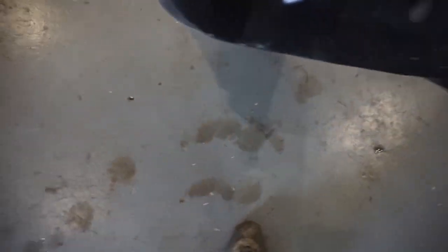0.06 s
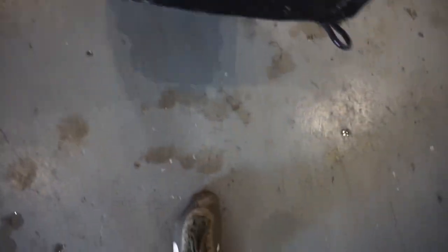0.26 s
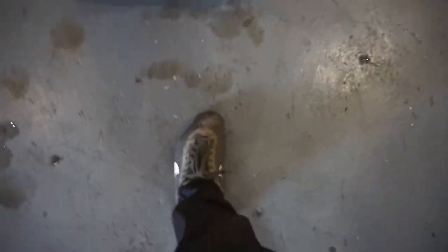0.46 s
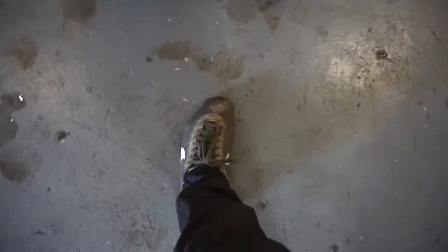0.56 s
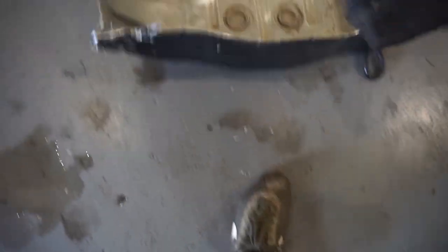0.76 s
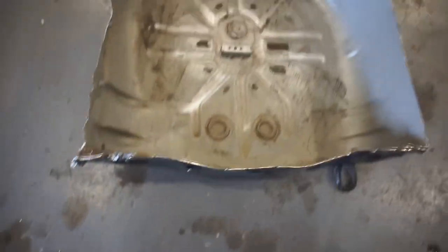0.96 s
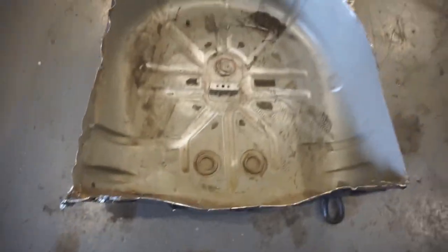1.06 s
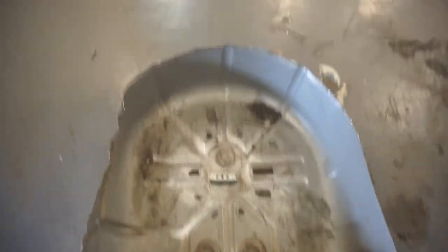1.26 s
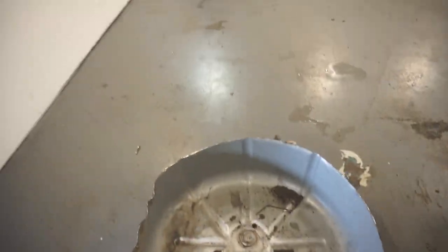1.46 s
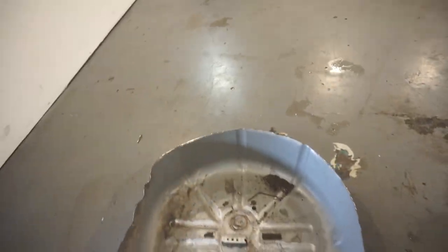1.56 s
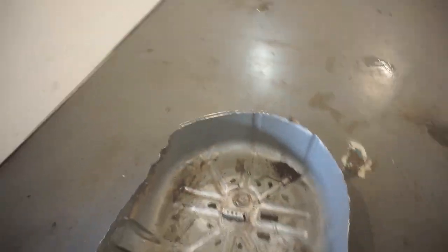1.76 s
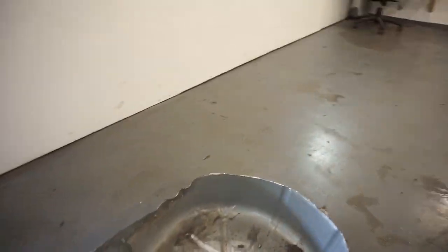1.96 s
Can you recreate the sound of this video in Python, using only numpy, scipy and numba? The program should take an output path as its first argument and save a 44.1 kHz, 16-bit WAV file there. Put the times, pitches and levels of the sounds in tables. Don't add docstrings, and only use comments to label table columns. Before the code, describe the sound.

A cut-out steel panel crashes onto a concrete garage floor. Soft cloth and shoe shuffling with tiny ticks comes first, then the slam at 0.44 seconds, with a short low boom, sharp edge cracks and scattering grit. It clatters and rocks, hitting hard again around 0.92 to 1.1, with a small hook clink near 1.25. Still by 1.36, the ring and bare-room echo fade to quiet.

```python
import sys
import numpy as np
from scipy import signal
from scipy.io import wavfile
from scipy.ndimage import uniform_filter1d
from numba import njit

SR = 44100
rng = np.random.default_rng(int(sys.argv[2]) if len(sys.argv) > 2 else 0)


def wrap_up_sound(samples):
    columns = np.atleast_2d(samples).T
    tamed = np.clip(columns, -1, 1)
    steps = np.round(tamed * 32767).astype(np.int16)
    wavfile.write(sys.argv[1], SR, steps)


def boost(x):
    u = np.asarray(x, float) / 20
    return 10 ** u


N = 88949

# t/s, contact level/dB, hardness/dB per octave, flexing of the whole sheet/dB per octave
LANDING = [
    (.444, -8.5, -4, 7.5),
    (.48, -17, -3.5, 1),
    (.555, -14, -4, 3.5),
    (.6, -22.5, 0.5, 8),
    (.67, -24, 0.5, 12.5),
    (.682, -22.5, 2, -10.5),
    (.76, -16.5, 1, -10),
    (.84, -14.5, -0.4, 1),
    (.918, -17, -2, -21.5),
]
ROCKING = [
    (0.926, -21, 1, 3.5),
    (.96, -17.5, 2, 2.5),
    (1.029, -15, 0.3, -1.5),
    (1.079, -12.5, -1.5, -29),
    (1.12, -18, 0.5, 6),
    (1.18, -24, 1.5, -1.5),
    (1.23, -22.5, 1.15, -16.5),
    (1.288, -25, 1.36, 7),
    (1.364, -33.5, 3, 1.5),
]
# f/Hz, level/dB, time to fade by 60 dB/s
PANEL_MODES = [(117, -18.5, 0.08), (237.67, -4, 0.2), (297.7, -6.5, 0.72), (444.6, 3.3, 0.66),
               (513, 7.5, 0.55), (598, 2, .4), (709, -4, 1), (820, -3.5, 0.13), (965, -2, 0.26),
               (1210, -13, 0.14), (1700, -17.5, .6), (1796, -13.5, .5), (2310, -20.5, .2), (2700, -11.5, 1)]
# f/Hz, level/dB per Hz
PLATE_COLOUR = [(60, -52.5), (170, -12.5), (250, 5), (700, 1), (1200, -8.5), (2900, -12.5), (4800, -19),
                (15000, -55)]
# t/s, level/dB, f/Hz, time to fade by 60 dB/s
RIM_KNOCKS = [(0.5402, -18.5, 2418, 0.14), (0.622, -13, 2830, 0.022), (0.6789, -12.5, 2275, 0.12),
              (0.6868, -21.5, 2200, 0.15), (0.7074, -12, 3030, 0.092), (0.7452, -12, 1996, 0.098),
              (0.8674, -10.5, 1672, 0.067), (0.9074, -8, 1560, 0.017), (0.9474, -17.5, 1974, 0.039),
              (0.9652, -8, 2900, 0.032), (1.035, -6.5, 2010, 0.042), (1.0424, -18, 2015, 0.15),
              (1.1119, -7, 1943, 0.084), (1.1433, -6.5, 1713, 0.13), (1.1857, -15, 1774, 0.15),
              (1.2774, -22, 1747, 0.073), (1.3129, -13.5, 1816, 0.032), (1.3254, -24.5, 1760, 0.11)]
# t/s, level/dB, f/Hz, time to fade by 60 dB/s
MIDDLE_SLAPS = [(0.596, -12, 456, 0.14), (0.634, -11.5, 530, 0.16), (0.696, -12, 442, 0.14),
                (0.752, -9.5, 667, 0.1), (0.791, -9, 451, 0.16), (0.862, -8.5, 522, 0.14),
                (0.91, -4.5, 443, 0.088), (1.006, -10, 502, 0.14), (1.044, -14, 625, 0.17),
                (1.083, -13, 607, 0.1), (1.148, -17, 530, 0.053), (1.176, -16.5, 447, 0.23),
                (1.209, -15.5, 707, 0.13), (1.272, -14.5, 708, 0.1)]
# t/s, f/Hz, level/dB
BOOM = [
    (.444, 281, -20),
    (.475, 236.3, -22),
    (.5, 242.8, -22.5),
    (.515, 240.5, -24.5),
    (.54, 285, -17.5),
    (.558, 315, -22.5),
    (.575, 283, -35.5),
    (.62, 262, -44),
]
# t/s, crack level/dB, blow into the panel/dB, crack colour f/Hz
CRACKS = [(.4872, -12, -40, 7900), (.5401, -6.5, -22.5, 4630), (.564, 0, -31.5, 11800),
          (.572, -1.5, -36, 11940), (.6069, -8.5, -27, 8700), (.6219, -9.5, -20.5, 4880),
          (.6359, -7, -18.5, 12300), (.6773, -18, -25, 4000), (.689, -22, -26, 12770),
          (.7082, -8.5, -17, 7100), (.7451, -10.5, -16, 5160), (.847, -21, -28, 8500),
          (.9212, 1.5, -10, 9500), (.9501, -30, -27.5, 7850), (.9641, 0.5, -18.5, 8400),
          (.9945, 0, -16, 11050), (1.0374, -21, -12, 5100), (1.1063, -20, -40.5, 9100),
          (1.1357, -22.5, -28.5, 8200), (1.1771, -27, -22, 9300), (1.2086, -17.5, -44, 9700),
          (1.221, -20, -17, 8950), (1.2495, -13, -19.5, 10700), (1.3133, -34, -39, 9000),
          (1.3253, -21, -47, 4360), (1.3492, -27, -48.5, 4900)]
# t/s, level/dB
CLINKS = [
    (1.2086, -52.),
    (1.221, -50.),
    (1.2495, -33.5),
]
# f/Hz, level/dB, time to fade by 60 dB/s
HOOK_MODES = [(9000, -6, .08), (10470, -1, .17), (11590, -5, .1), (12860, -4, .11), (13940, -4, .2),
              (14740, -6, .11)]
# start t/s, length/s, level/dB
GRIT = [
    (0.486, 0.31, -25.5),
    (0.903, 0.19, -34),
    (1.25, 0.09, -58),
]
# t/s, level/dB, colour f/Hz, decay/s
THUMPS = [
    (0.499, -23, 115., .04),
    (.545, -24, 93, 0.017),
    (0.677, -24, 59.3, .02),
    (.765, -33.5, 78.4, 0.013),
    (.915, -38, 60.7, 0.016),
    (1.243, -51, 62.7, 0.019),
]
# t/s, level/dB, colour f/Hz, decay/s
TICKS = [
    (.3055, -33, 5000., .0012),
    (.307, -48, 3500., .035),
    (.4012, -30, 8000., .0008),
    (.403, -41, 750., .025),
    (1.906, -61, 1050., .012),
]
# f/Hz, time to fade by 60 dB/s
ROOM_FADE = [(150, 0.44), (300, 0.73), (700, 0.86), (1100, 0.78), (1800, 0.76), (2900, 0.53), (5500, 0.58),
             (13000, 0.31)]
# f/Hz, level/dB per Hz
AIR_COLOUR = [(24, -23.5), (60, -14), (284, 2.5), (382, -11), (676, -1.5), (728, -5.5), (1650, -11),
              (1820, -7.5), (15000, -27)]
# t/s, level/dB
SHUFFLE = [
    (0.0, -47.5),
    (0.202, -53.5),
    (0.322, -45),
    (0.382, -48.5),
    (0.41, -45.5),
    (0.428, -56),
    (0.43, -43.5),
]
# f/Hz, width/Hz, level added/dB
HOUSING = [(285, 49, -12.5), (707, 200, -7.5), (1667, 1100, -6), (2810, 330, -6.5)]
# t/s, depth/dB (negative lifts)
DUCKS = [
    (.56, 3),
    (0.646, -3.5),
    (.918, 7.5),
    (.99, 3.5),
    (1.091, 2.5),
    (1.249, -1),
]

CONTACTS_PER_S, CONTACT_SPREAD_DB = 2500., 1.5
PLACE_S = .045
SLAM_DB, BLOW_S = 7, .0015
FLEX_HZ, UNLIKE = 397, 1.2
MAIN_WANDER = 0.57
PANEL_DB, PANEL_T60_MAX_S = -8.5, .55
PLATE_T60_S, T60_SLOPE = 0.15, -0.74
KNOCK_DB, KNOCK_SPREAD, KNOCK_PUSH_S = -13.5, .25, 0.00067
CRACK_S, CRACK_TAIL_S, CRACK_TAIL_DB = 0.0043, 0.011, -14.5
CRACK_LOW_HZ, CRACK_PEAK_DB = 4000., 1.
GRIT_PER_S, GRIT_LOW_HZ = 1900, 3200.
ROOM_LOW_HZ, ROOM_DB, ROOM_BUILD_S, ROOM_SIDE = 167, -8, 0.036, 0.68
AFTER_DB = -73.5
MIC_LOW_HZ, MIC_TOP_HZ = 119, 15650
SIDE_HZ, SIDE_DB, LEFT_LAG_S = 1500., 1.1, 2.5e-5
DUCK_ATTACK_S, DUCK_RELEASE_S = 0.005, 0.1
LOPSIDED = .035


def level(x, db):
    return x * boost(db) / np.sqrt(np.mean(x ** 2))


def curve(table, x, col=1):
    rows = np.array(table)
    return np.interp(x, rows[:, 0], rows[:, col])


def colour(table, hz):
    return curve([(np.log(f), db) for f, db in table], np.log(hz))


def band(x, hz, width):
    return signal.lfilter(*signal.iirpeak(min(hz, .45 * SR), hz / width, fs=SR), x)


def high_pass(x, order, hz):
    return signal.sosfilt(signal.butter(order, hz, "high", fs=SR, output="sos"), x)


@njit
def ring(x, poles, gains, places, hold):
    y = np.zeros((2, len(x)))
    for k in range(len(poles)):
        z = 0j
        for i in range(len(x)):
            z = z * poles[k] + x[i] * places[k, i // hold]
            y[0, i] += gains[0, k] * z.imag - gains[1, k] * z.real
            y[1, i] += gains[1, k] * z.real + gains[0, k] * z.imag
    return y


def modes(force, hz, gains, t60, wander):
    hold = int(PLACE_S * SR)
    wander = np.reshape(wander, (-1, 1))
    places = 1 - wander + wander * rng.standard_normal((len(hz), N // hold + 1))
    gains = np.array([gains, UNLIKE / 2 * gains * rng.standard_normal(len(hz))])
    poles = np.exp(2j * np.pi * hz / SR - np.log(1000) / (t60 * SR))
    return ring(force + 1e-18, poles, gains, places, hold)


def contact_force(t, motion):
    on = (t >= motion[0][0]) & (t < motion[-1][0])
    hit = rng.random(N) < CONTACTS_PER_S / SR
    strength = boost(CONTACT_SPREAD_DB * (rng.exponential(size=N) - 2.5))
    force = hit * on * rng.standard_normal(N) * strength
    force = force * np.sqrt(SR / CONTACTS_PER_S) * boost(curve(motion, t))
    shape = np.exp(-np.arange(600) / (BLOW_S * SR))
    slam = (motion[0][0], motion[0][1] + SLAM_DB)
    for s, db in [slam] + [(row[0], row[2] + 10) for row in CRACKS]:
        force[int(s * SR):][:len(shape)] += boost(db) * shape * rng.standard_normal(len(shape))
    return force


def panel(t):
    motion = list(LANDING) + list(ROCKING)
    force = contact_force(t, motion)
    dense = np.r_[np.arange(70, 4000, 12.), np.arange(4000, 15500, 45.)]
    spacing = np.gradient(dense)
    dense = dense + spacing * rng.uniform(-0.21, 0.56, size=len(dense))
    dense_t60 = PLATE_T60_S * (dense / 500) ** T60_SLOPE
    dense_gains = boost(colour(PLATE_COLOUR, dense)) * np.sqrt(spacing / dense_t60)

    main = np.array(PANEL_MODES)
    main_t60 = np.clip(main[:, 2], .05, PANEL_T60_MAX_S)
    main_gains = boost(main[:, 1] + PANEL_DB) * np.sqrt(100 / main_t60)

    hz, t60 = np.r_[dense, main[:, 0]], np.r_[dense_t60, main_t60]
    gains = np.r_[dense_gains, main_gains]
    gains = gains / np.sqrt(np.sum(gains ** 2 * t60 * SR / (4 * np.log(1000))))
    wander = np.r_[np.ones(len(dense)), np.full(len(main), MAIN_WANDER)]
    octave = np.round(2 * np.log2(hz / FLEX_HZ)) / 2
    hard, flex = curve(motion, t, col=2), curve(motion, t, col=3)
    out = np.zeros((2, N))
    for o in np.unique(octave):
        pick = octave == o
        tilt_db = -flex * max(o, -1.5) if o < 0 else hard * o
        out += modes(force * boost(tilt_db), hz[pick], gains[pick], t60[pick], wander[pick])
    return out


def knocks():
    out = np.zeros((2, N))
    age = np.arange(4000)[:, None] / SR
    events = list(RIM_KNOCKS) + list(MIDDLE_SLAPS)
    chance = rng.standard_normal((len(events), 3, 5))
    for (s, db, hz, t60), (spread, left, right) in zip(events, chance):
        turn = 2 * np.pi * hz * (1 + KNOCK_SPREAD * spread * np.arange(5) / 4) * age
        fade = boost(db + KNOCK_DB - 60 * age / np.clip(t60, .01, .2))
        fade = fade * (1 - np.exp(-age / KNOCK_PUSH_S))
        pair = [np.sum(fade * np.sin(turn + phase), axis=1) for phase in (left, left + right / 2)]
        out[:, int(s * SR):][:, :len(age)] += pair
    return out


def boom(t):
    fade_in = np.clip((t - BOOM[0][0]) / .003, 0, 1)
    fade_out = np.clip((BOOM[-1][0] - t) / .02, 0, 1)
    tone = np.sin(2 * np.pi * np.cumsum(curve(BOOM, t)) / SR)
    return fade_in * fade_out * np.sqrt(2) * boost(curve(BOOM, t, col=2)) * tone


def edge_cracks():
    out = np.zeros((2, N))
    age = np.arange(8000) / SR
    fade = np.exp(-age / CRACK_S) + boost(CRACK_TAIL_DB) * np.exp(-age / CRACK_TAIL_S)
    for s, db, _, hz in CRACKS:
        noise = rng.standard_normal((3, 8000))
        noise = .5 * noise[0] + 1.4 * noise[1:]
        noise = high_pass(noise, 3, min(CRACK_LOW_HZ, 0.23 * hz))
        noise = noise + boost(CRACK_PEAK_DB) * 2 * band(noise, hz, hz / 2)
        out[:, int(s * SR):][:, :8000] += level(noise, db - 10.5) * fade
    return out


def hook():
    force, rows = np.zeros(N), np.array(HOOK_MODES)
    for s, db in CLINKS:
        force[int(s * SR)] = boost(db)
    return modes(force, rows[:, 0], boost(rows[:, 1]), np.clip(rows[:, 2], .05, .6), wander=0)


def grit(t):
    chips = (rng.random((2, N)) < GRIT_PER_S / SR) * rng.standard_normal((2, N))
    chips = level(high_pass(chips, 2, GRIT_LOW_HZ), 0)
    return chips * sum(boost(db) * (t > s) * np.clip(1 - (t - s) / length_s, 0, 1) for s, length_s, db in GRIT)


def ticks_and_thumps(t):
    out = np.zeros((2, N))
    for s, db, hz, decay_s in list(TICKS) + list(THUMPS):
        noise = rng.standard_normal((3, N))
        noise = noise[0] + .4 * noise[1:]
        noise = band(band(noise, hz, 1.4 * hz), hz, 1.4 * hz)
        out += level(noise, db) * (t >= s) * np.exp(-np.maximum(t - s, 0) / decay_s)
    return out


def garage(x):
    age = np.arange(SR) / SR
    noise = rng.standard_normal((2, SR))
    noise = noise[0] + ROOM_SIDE * noise[1] * np.array([[1], [-1]])
    tail = np.zeros((2, SR))
    for hz in 110 * 2 ** np.arange(0, 7.3, .5):
        fade = np.exp(-np.log(1000) * age / curve(ROOM_FADE, hz))
        tail += band(band(noise, hz, hz / 2), hz, hz / 2) * fade
    tail = tail * (1 - np.exp(-age / ROOM_BUILD_S))
    tail = tail / np.sqrt(np.sum(tail ** 2) / 2)
    return signal.fftconvolve(x[None], tail, axes=1)[:, :N]


def air(t):
    out = np.zeros((2, N))
    for hz in 40 * 2 ** np.arange(0, 8.6, .5):
        noise = band(band(rng.standard_normal((2, N)), hz, hz / 2), hz, hz / 2)
        flicker = np.repeat(rng.standard_normal(N // 1500 + 1), 1500)
        flicker = uniform_filter1d(flicker, 1500)[:N]
        out += boost(colour(AIR_COLOUR, hz) + 1.4 * flicker) * noise
    return level(out, 0) * boost(np.where(t < LANDING[0][0], curve(SHUFFLE, t), AFTER_DB))


def scene():
    t = np.arange(N) / SR
    near = panel(t) + knocks() + boom(t) + edge_cracks() + hook() + grit(t) + ticks_and_thumps(t)
    room = garage(high_pass(near.mean(axis=0), 2, ROOM_LOW_HZ))
    return near + boost(ROOM_DB) * room + air(t)


def band_limit(x):
    return signal.sosfilt(signal.butter(12, 16970, fs=SR, output="sos"), x)


def record(dry):
    t = np.arange(N) / SR
    dry = high_pass(dry, 3, MIC_LOW_HZ)
    dry = dry + sum(boost(db) * band(dry, hz, width) for hz, width, db in HOUSING)
    mid = dry.mean(axis=0)
    side = signal.lfilter(*signal.butter(1, SIDE_HZ, "high", fs=SR), dry[0] - dry[1]) / 2
    side = boost(SIDE_DB) * side - LEFT_LAG_S * SR * np.gradient(mid) / 2
    duck_db = np.zeros(N)
    for s, db in DUCKS:
        attack = np.clip((t - s) / DUCK_ATTACK_S, 0, 1)
        duck_db += db * attack * np.exp(-np.maximum(t - s, 0) / DUCK_RELEASE_S)
    x = np.array([mid + side, mid - side]) * boost(-duck_db)
    x = x + LOPSIDED * signal.lfilter(*signal.butter(1, 20, "high", fs=SR), x ** 2)
    x = np.tanh(1.1 * x) / 1.1
    x = signal.sosfilt(signal.ellip(8, .3, 55, MIC_TOP_HZ, fs=SR, output="sos"), x)
    return band_limit(x)


dry = scene()
out = record(dry)
wrap_up_sound(out)
```